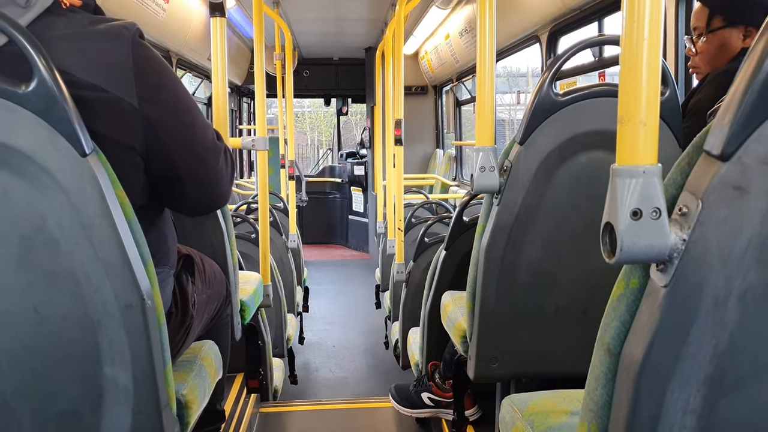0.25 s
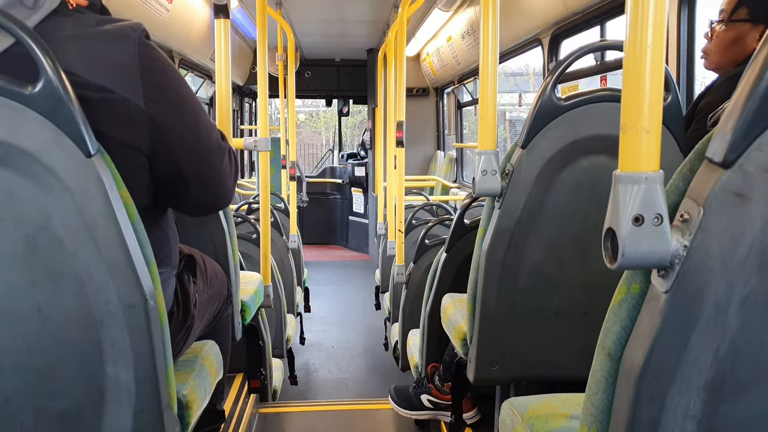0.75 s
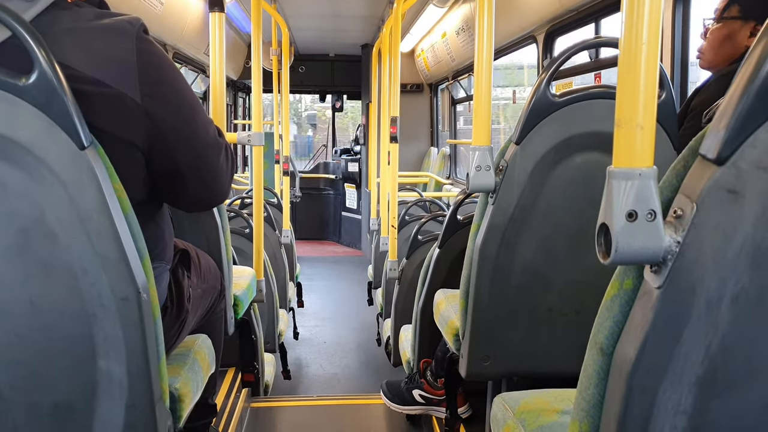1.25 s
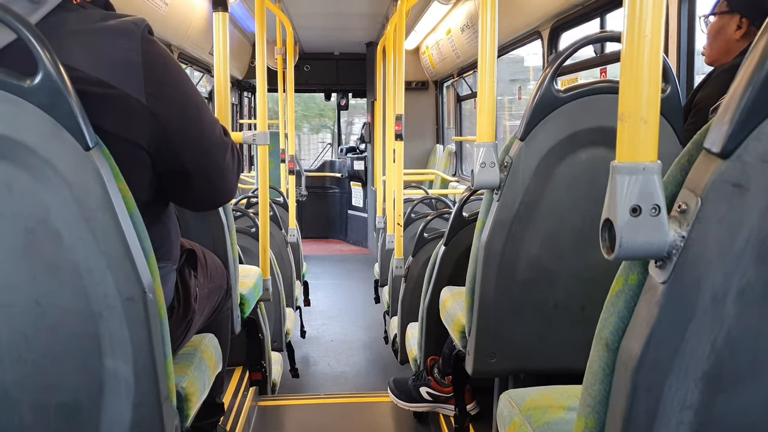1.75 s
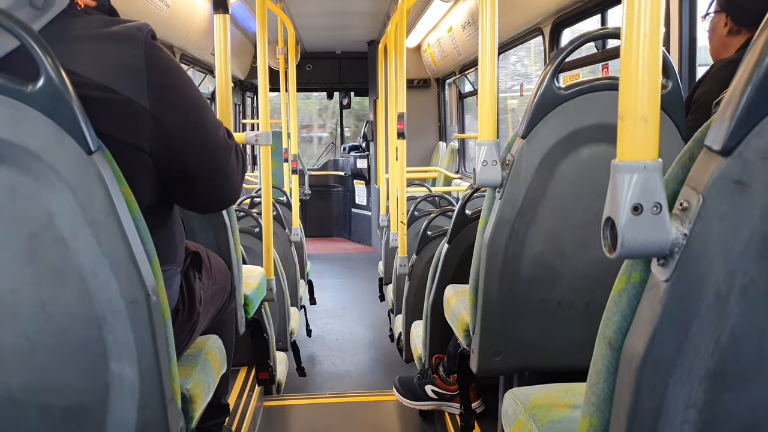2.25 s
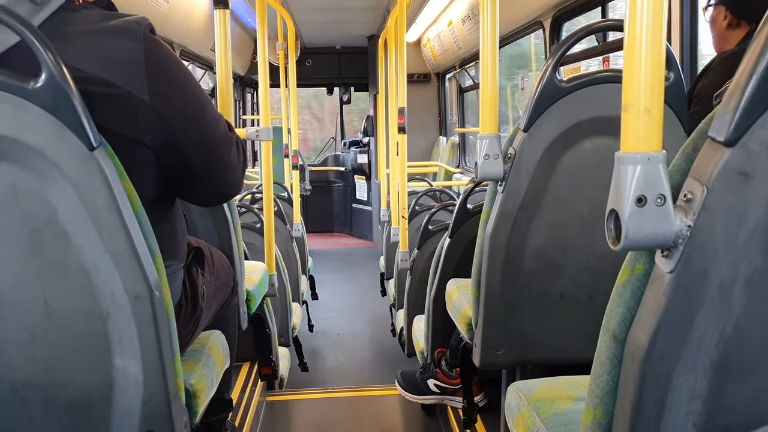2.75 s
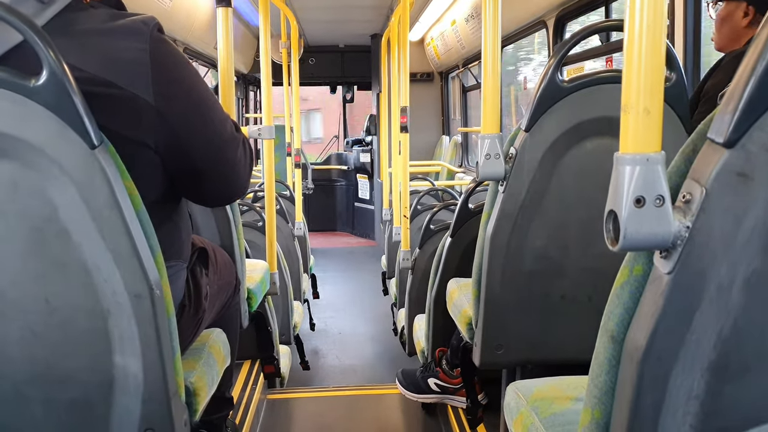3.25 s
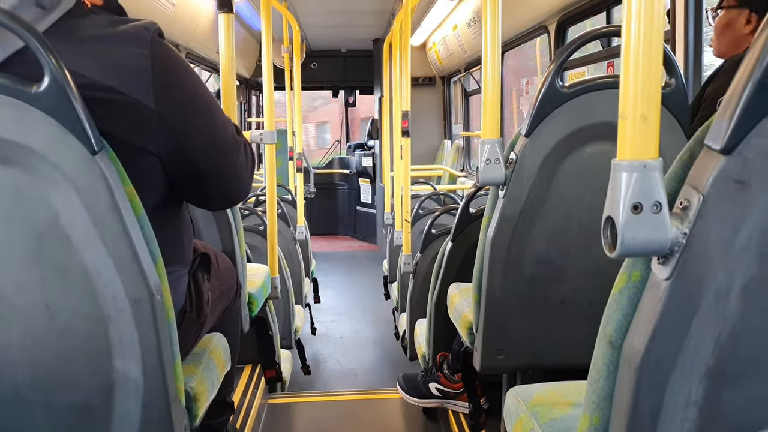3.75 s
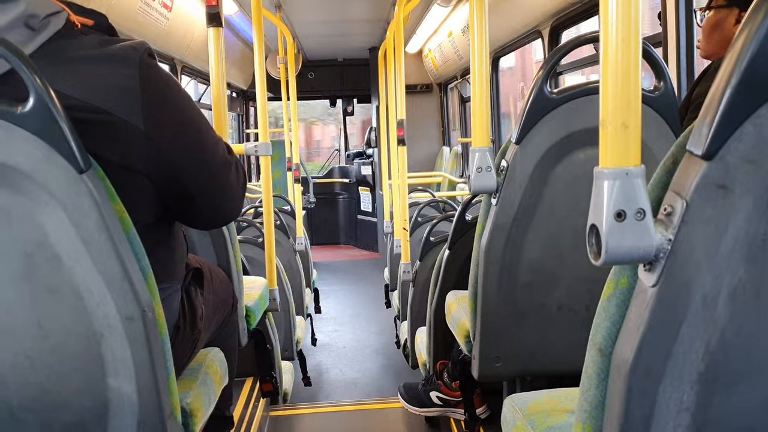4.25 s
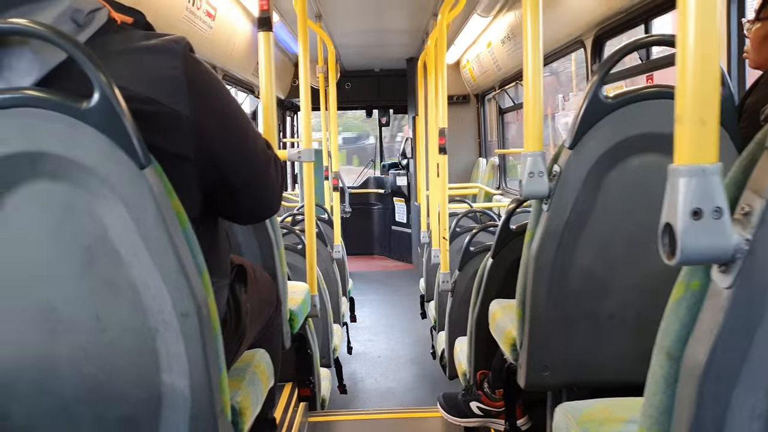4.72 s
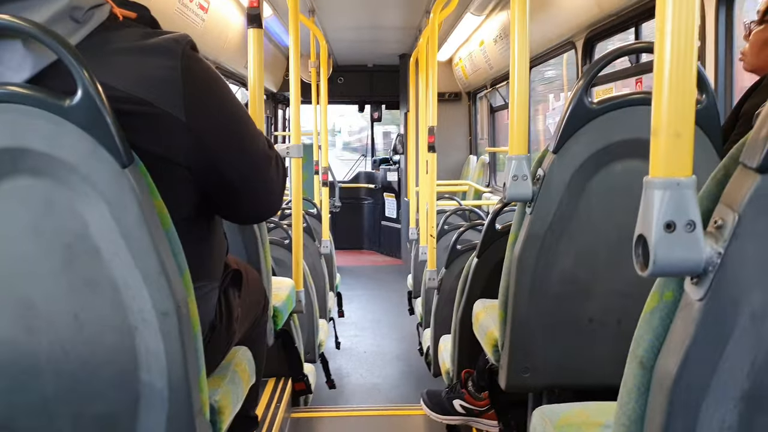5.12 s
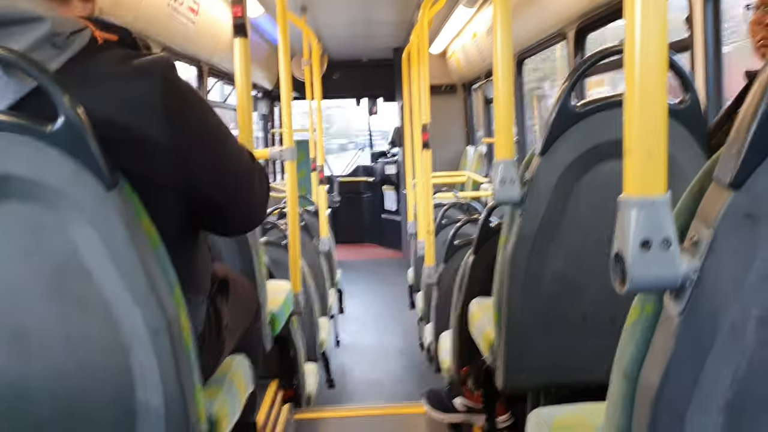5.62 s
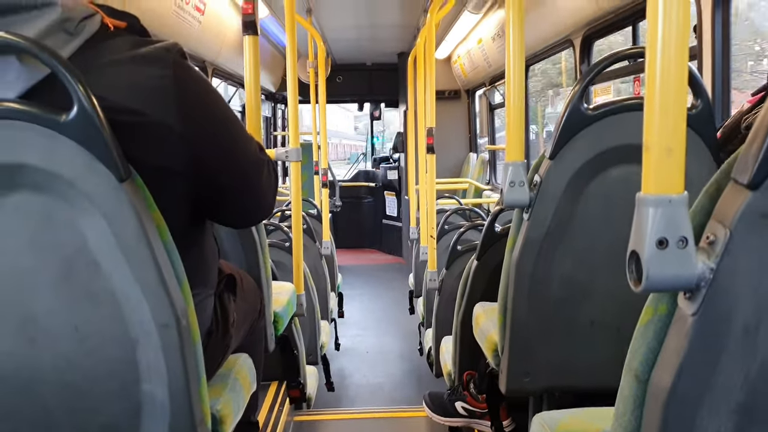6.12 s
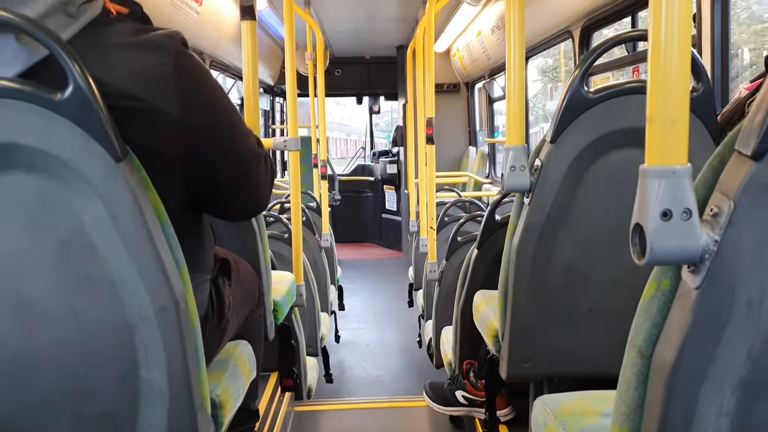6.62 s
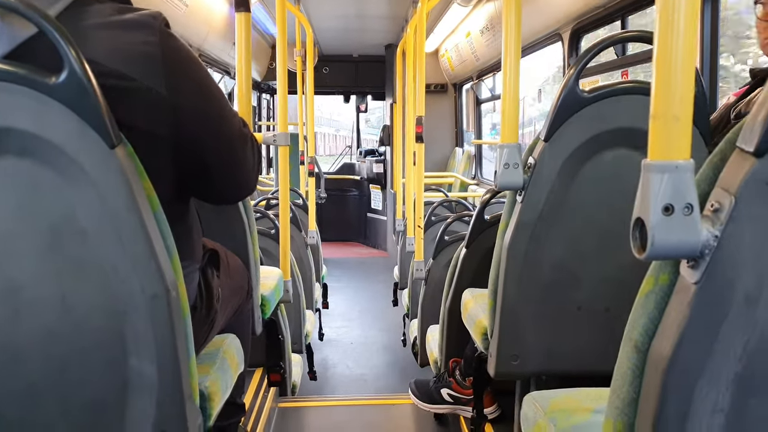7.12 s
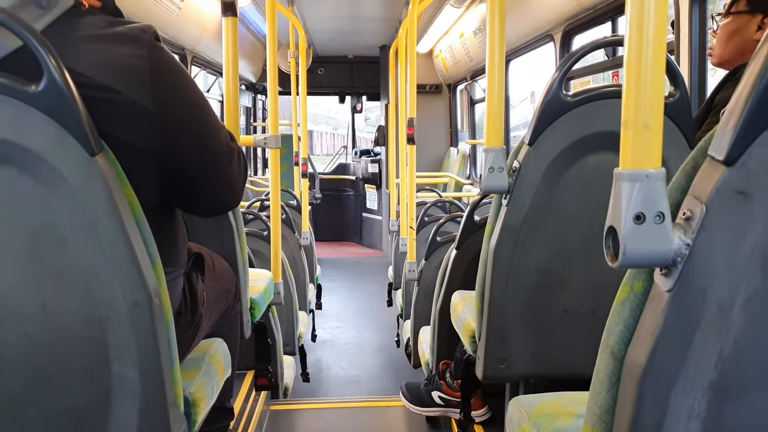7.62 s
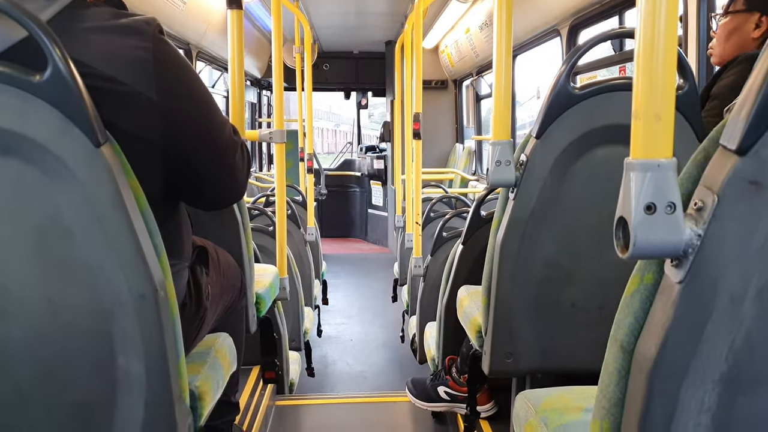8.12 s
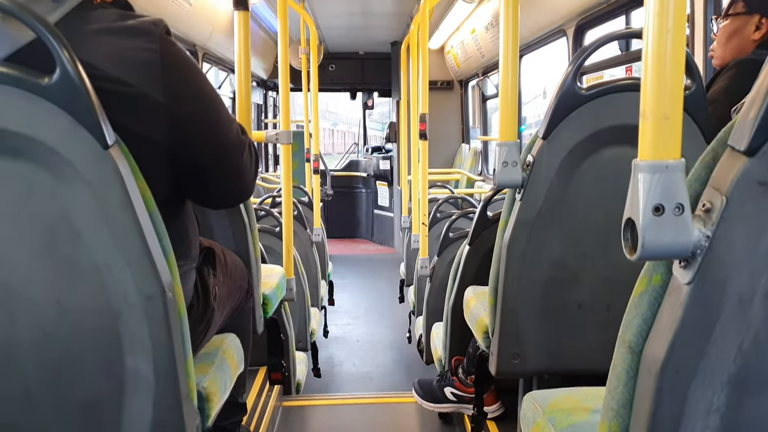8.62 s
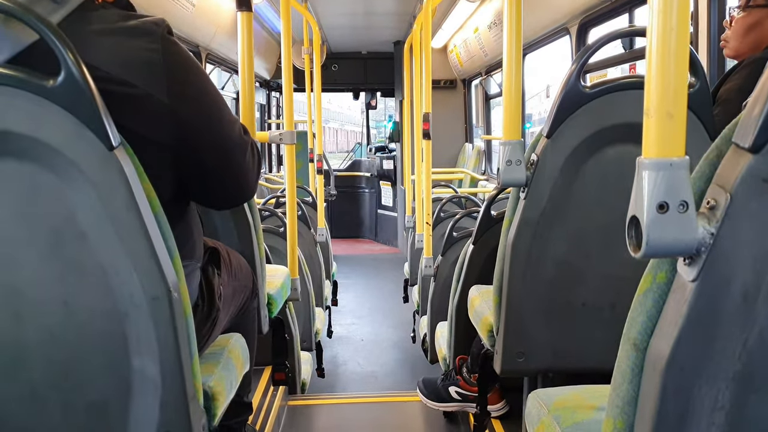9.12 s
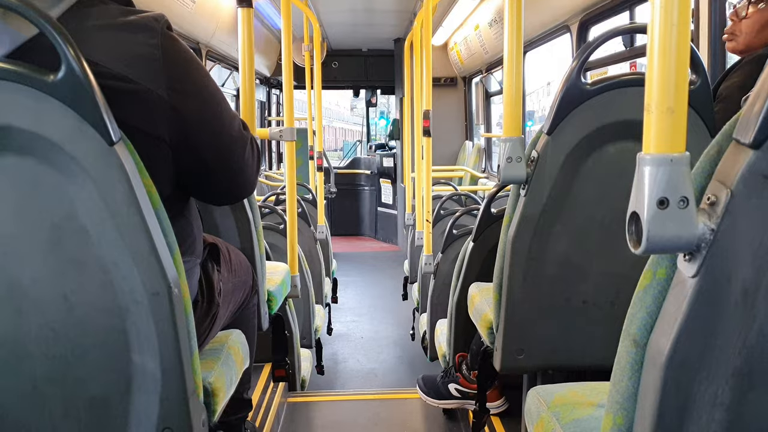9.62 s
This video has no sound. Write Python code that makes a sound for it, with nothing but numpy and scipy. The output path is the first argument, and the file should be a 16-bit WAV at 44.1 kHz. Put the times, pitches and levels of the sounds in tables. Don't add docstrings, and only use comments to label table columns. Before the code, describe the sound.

Heard from a seat inside a city bus, a six-cylinder diesel under the rear floor dominates. In the first 0.6 seconds its deep firing drone sweeps up nearly an octave, with a low floor thump and singing whines. It creeps up until 2 seconds, levels, then climbs steadily from 2.8 to 4.4, gear whine strongest around 3.5. It eases slightly and holds from 5 to 7.8, a little softer, inching higher. At about 8 the pull drops away and pitch sags until 8.4, then flares to a peak at 9 and settles lower, pulling again to the end. Boomy tire and engine roar runs throughout, with rough valve knocking clearest early. A very faint, high turbo whistle wavers from 4.7. Jolts bring brief trim ticks and buzzes, notably at 0.3, 3.3, 5.3, a cluster near 5.8 to 6, 6.7 and 9. Close, enclosed phone stereo with dull treble.

```python
import sys
import numpy as np
from scipy import signal
from scipy.fft import rfft, irfft, next_fast_len
from scipy.io import wavfile
from scipy.ndimage import uniform_filter1d

SR = 44100
rng = np.random.default_rng(int(sys.argv[2]) if len(sys.argv) > 2 else 0)


def unload_wav(signal):
    wavfile.write(
        sys.argv[1],
        SR,
        np.round(np.clip(np.atleast_2d(signal).T, -1, 1) * 32767).astype(np.int16),
    )


def level_to_linear(level):
    exponent = np.asarray(level, float) / 20
    return 10 ** exponent


N = 434812
T = np.arange(N) / SR
COARSE = 4
ENGINE_T = np.arange(N // COARSE + 1) * COARSE / SR

# (time [s], firing rate [Hz], firing boom [dB], second order [dB], gear whine [dB])
ENGINE = [(0.0, 36.3, -31, -29, -63), (0.15, 43.0, -19, -22, -68), (0.3, 55.5, -21, -26, -67),
          (0.45, 64.6, -17, -22, -46), (0.6, 67.9, -16, -29, -44), (0.75, 69.6, -18, -23, -44),
          (0.9, 70.7, -18, -20, -49), (1.05, 72.2, -18, -20, -54), (1.2, 72.9, -17, -20, -51),
          (1.35, 73.7, -18, -21, -49), (1.5, 74.3, -18, -24, -47), (1.65, 75.0, -18, -27, -50),
          (1.8, 75.5, -20, -30, -50), (1.95, 75.5, -21, -31, -48), (2.1, 74.9, -20, -29, -52),
          (2.25, 74.5, -21, -27, -48), (2.4, 74.3, -20, -29, -47), (2.55, 74.1, -19, -28, -49),
          (2.7, 74.8, -19, -27, -49), (2.85, 76.8, -22, -38, -51), (3.0, 79.5, -20, -25, -51),
          (3.15, 82.1, -17, -23, -45), (3.3, 84.9, -18, -27, -43), (3.45, 87.2, -18, -24, -38),
          (3.6, 89.8, -16, -24, -42), (3.75, 91.8, -15, -28, -41), (3.9, 94.0, -17, -24, -46),
          (4.05, 96.2, -18, -22, -47), (4.2, 99.2, -16, -19, -45), (4.35, 102.3, -17, -20, -42),
          (4.5, 101.2, -15, -17, -45), (4.65, 99.3, -17, -17, -47), (4.8, 97.5, -18, -17, -52),
          (4.95, 96.7, -20, -18, -57), (5.1, 96.6, -18, -20, -59), (5.25, 96.8, -18, -20, -54),
          (5.4, 96.8, -19, -20, -48), (5.55, 96.8, -20, -19, -52), (5.7, 97.0, -19, -20, -55),
          (5.85, 96.9, -19, -20, -55), (6.0, 96.9, -22, -21, -53), (6.15, 97.2, -21, -21, -56),
          (6.3, 97.5, -21, -21, -52), (6.45, 97.7, -22, -22, -53), (6.6, 98.0, -22, -21, -50),
          (6.75, 98.4, -21, -21, -51), (6.9, 98.7, -22, -20, -49), (7.05, 99.1, -22, -20, -46),
          (7.2, 99.7, -19, -21, -47), (7.35, 100.4, -19, -20, -47), (7.5, 100.9, -19, -20, -44),
          (7.65, 101.5, -19, -20, -45), (7.8, 102.3, -18, -23, -47), (7.95, 99.2, -20, -24, -46),
          (8.1, 90.3, -30, -34, -53), (8.25, 82.0, -31, -36, -54), (8.4, 78.4, -35, -37, -64),
          (8.55, 80.8, -28, -37, -52), (8.7, 89.3, -27, -40, -44), (8.85, 95.7, -25, -30, -46),
          (9.0, 99.8, -23, -26, -45), (9.15, 96.3, -19, -28, -45), (9.3, 90.5, -18, -28, -43),
          (9.45, 87.2, -18, -25, -40), (9.6, 86.5, -18, -26, -42), (9.75, 86.8, -19, -26, -40),
          (9.86, 87.0, -19, -26, -37)]
# (time [s], floor rumble [dB], engine roar [dB], clatter hiss [dB], air hiss [dB])
ROAR = [(0.0, -29.5, -34, -57, -72), (0.16, -17, -32, -53, -69.5), (0.41, -26, -29, -49, -65),
        (0.52, -20, -29.5, -51.5, -64.5), (0.84, -30, -29, -51.5, -66.5), (1.15, -26.5, -27.5, -51.5, -65),
        (1.45, -34, -28, -52, -66.5), (2.35, -35, -28.5, -53.5, -68.5), (2.49, -27.5, -29.5, -54.5, -69),
        (2.71, -34, -27.5, -54, -66.5), (3.53, -30, -26, -48.5, -63.5), (3.61, -38.5, -26, -49.5, -64.5),
        (3.75, -33, -27, -48.5, -63.5), (5.09, -31, -30, -49, -64), (5.63, -34.5, -30, -49, -63),
        (5.72, -23, -30, -47.5, -63.5), (6.15, -34.5, -32, -51, -64.5), (6.7, -31.5, -31.5, -52.5, -67),
        (7.63, -31, -29, -50, -65), (8.01, -27.5, -31, -52.5, -66), (8.59, -29.5, -32.5, -56.5, -71),
        (8.7, -27, -31.5, -53.5, -70), (9.05, -34, -27, -51.5, -68), (9.13, -24.5, -28, -51, -66),
        (9.82, -35, -28.5, -50, -64.5)]
# (frequency [Hz], likeness [0-1], left lead [rad], left minus right [dB])
PORTS = [(30, 1, .08, -0.5), (55, 1, .09, 0.5), (68.6, .95, 0.75, -2.5), (93.5, 0.6, .55, 0.8),
         (150, 1, 0.16, 2), (287, 0.76, .1, 0.5), (450, 0.5, 0.93, 3), (610, 0.2, 0.81, 4.5),
         (930, 0, 1.25, 3), (1610, 0.3, 2.28, 3.5), (2170, 0.1, 3.1, 10.5), (4500, 0, 3.1, 7),
         (6350, 0.01, 3.1, 8), (9000, 0, 3.1, 0.5), (13000, .03, 3.1, 5)]


def evened(x):
    return x / np.sqrt(np.mean(x ** 2) + 1e-20)


def read(points, hz, axis=1):
    rows = np.transpose(points)
    return np.interp(np.log(hz + 1), np.log(rows[0] + 1), rows[axis])


def drift(rate_hz, t):
    b, a = signal.butter(1, rate_hz * 512 / SR)
    slow = signal.lfilter(b, a, rng.standard_normal(N // 256 + 202))[200:]
    return np.interp(t * SR / 256, np.arange(len(slow)), evened(slow))


def treble_of(x, order, cutoff_hz):
    return signal.sosfilt(signal.butter(order, cutoff_hz, "high", fs=SR, output="sos"), x)


def cabin_db(hz):
    # (frequency [Hz], width [Hz], lift [dB])
    resonances = [(70.5, 20, 6.5), (162.2, 21.8, 8.5), (192.4, 27.7, 15.5), (266.2, 15.6, 10.5),
                  (298.1, 18.5, 9), (362.5, 42.4, 6.5), (421.8, 23.6, 7), (552, 46, 9), (792.3, 13.3, 12.5),
                  (881, 27, 4), (1036, 25, -0.5), (1542, 95, 12), (2270, 40, 7), (3380, 1500, 5.5),
                  (4560, 180, 5)]
    return sum(db / (1 + (2 * (hz - f) / width) ** 2) for f, width, db in resonances)


def ports(hz):
    level = level_to_linear(read(PORTS, hz, axis=3) / 2)
    half = level * np.exp(.5j * read(PORTS, hz, axis=2))
    return np.array([half, 1 / half])


def heard(x):
    size = next_fast_len(x.shape[-1])
    spectrum = rfft(x, size) * ports(np.fft.rfftfreq(size, COARSE / SR))
    return COARSE * irfft(spectrum, COARSE * size)[:, :N]


def order_tone(turn, k, db, waver_db, wander_rad):
    level = level_to_linear(db + waver_db * drift(3.4, ENGINE_T))
    phase = k * turn + 2 * np.pi * rng.random() + wander_rad * drift(3.7, ENGINE_T)
    return level * np.sqrt(2) * np.cos(phase)


def firing_boom(turn):
    s, _, boom_db, second_db, _ = np.transpose(ENGINE)
    boom = level_to_linear(np.interp(ENGINE_T, s, boom_db)) * np.cos(turn)
    octave = level_to_linear(np.interp(ENGINE_T, s, second_db) + 0.1) * np.cos(2 * turn + 1.72)
    return np.sqrt(2) * (boom + octave)


def strong_tones(turn):
    strong_orders = [.686, 2.745, 4.118, 2.205, 3, 4, 5, 8, 12, 36]
    # (time [s], then level of each tone [dB])
    strong_levels = [(0.0, -42.5, -35, -46.5, -39.5, -51.5, -52.5, -45, -84.5, -60, -52),
                     (0.35, -28.5, -49.5, -36, -43.5, -27.5, -65, -42, -73, -54, -46.5),
                     (0.6, -24.5, -54, -35, -35.5, -19.5, -40, -42, -46, -41, -50.5),
                     (0.9, -29.5, -66, -35.5, -27.5, -26, -39.5, -34, -50.5, -45, -61),
                     (1.25, -30.5, -46.5, -31, -26, -32, -35.5, -31, -51, -51, -56),
                     (1.7, -40.5, -41.5, -35, -29, -30.5, -26.5, -48, -69.5, -44, -62),
                     (2.5, -30.5, -38, -29.5, -24, -40.5, -31, -52.5, -50.5, -48.5, -60),
                     (3.0, -36, -61, -45, -28, -32, -29.5, -53.5, -67, -47, -64),
                     (3.35, -39, -51, -34, -29.5, -43, -44.5, -51.5, -51, -51, -63),
                     (3.7, -37.5, -58, -47, -33.5, -33.5, -34, -55, -60, -55, -64),
                     (4.05, -30, -26.5, -41.5, -35.5, -43.5, -36, -60, -52, -61, -70),
                     (4.4, -22, -30.5, -49.5, -25.5, -52, -46, -43, -49.5, -59, -57.5),
                     (4.8, -29.5, -37.5, -51, -33, -43.5, -35.5, -46.5, -59.5, -64.5, -69.5),
                     (5.5, -27.5, -34, -58, -36, -44.5, -42.5, -47.5, -57.5, -56, -68),
                     (6.3, -31, -40.5, -56, -36.5, -53, -43, -48, -47.5, -61, -71),
                     (7.102, -30, -33, -50, -38, -51.5, -42, -44.5, -54, -65.5, -62.5),
                     (7.75, -26.5, -33.5, -46, -28.5, -44.5, -52, -49, -59, -50, -68),
                     (8.1, -38, -31.5, -41.5, -37, -43, -58, -63, -68, -64, -67),
                     (8.45, -51.5, -52, -38, -27.5, -34, -70, -56, -74, -62, -79),
                     (8.8, -27.5, -43, -39, -36, -32, -44.5, -72, -65, -53, -73),
                     (9.1, -23.5, -24.5, -54, -27.5, -55, -50, -78, -58, -70, -76),
                     (9.4, -44.5, -33, -44, -39.5, -60, -32.5, -44, -55, -59, -67),
                     (9.8, -42.5, -32.5, -33, -28, -45, -36, -68, -58, -55, -71)]
    when, *levels = np.transpose(strong_levels)
    out = np.zeros(len(ENGINE_T))
    for k, db in zip(strong_orders, levels):
        size = min(k, 14)
        out += order_tone(turn, k, np.interp(ENGINE_T, when, db), 0.46 + 0.2 * size, 0.049 + 0.044 * size)
    return out


def lesser_tones(turn):
    firing_orders, belt_orders, gear_orders = [6, 7, 9, 10, 11, 16], [1.372, 3.43, 4.803, 4.41, 6.615], [18, 30]
    firing_levels, belt_levels, gear_levels = [-58.5, -56.5, -65, -58.5, -65, -65], [-38, -45.5, -49.5, -44.5, -49.5], [-63, -66]
    pairs = zip(firing_orders + belt_orders, firing_levels + belt_levels)
    lesser = sum(order_tone(turn, k, db, 2.35, 0.24) for k, db in pairs)
    gears = []
    for port in range(2):
        gears.append(sum(order_tone(turn, k, db, 3, .8) for k, db in zip(gear_orders, gear_levels)))
    return lesser + np.array(gears)


def gear_whine(turn):
    s, whine_db = np.transpose(ENGINE)[[0, 4]]
    throb = 1 + 0.23 * np.cos(turn / 3) + 0.16 * np.cos(turn / 6)
    level_db = np.interp(ENGINE_T, s, whine_db) - 1.2 + 2.2 * drift(16., ENGINE_T)
    mesh = order_tone(turn, 24, level_db, .6, .9) * throb
    left = level_to_linear(-3.5 + 1.6 * drift(20., ENGINE_T)) * mesh
    right = level_to_linear(1.5 + 1.6 * drift(20., ENGINE_T)) * np.roll(mesh, shift=2)
    return np.array([left, right])


def uneven_cylinders(turn):
    step = np.exp(1j * turn / 3)
    comb, now = np.zeros(len(turn)), np.ones(len(turn))
    for height, angle in rng.random((75, 2)):
        now = now * step
        comb += (level_to_linear(-9 * height + 7.5) * np.exp(2j * np.pi * angle) * now).real
    return comb


def engine():
    # (frequency [Hz], level [dB])
    crank_colour = [(30, -32.5), (200, -45.5), (400, -48), (600, -52.5), (900, -58.5), (1600, -62.5),
                    (2600, -77.5)]
    s, rate_hz = np.transpose(ENGINE)[:2]
    rate_hz = uniform_filter1d(np.interp(ENGINE_T, s, rate_hz), size=600)
    turn = 2 * np.pi * np.cumsum(rate_hz) * COARSE / SR

    size = next_fast_len(len(turn))
    f = np.fft.rfftfreq(size, COARSE / SR)
    comb = rfft(uneven_cylinders(turn), size) * level_to_linear(read(crank_colour, f))
    spectrum = (rfft(lesser_tones(turn), size) + comb) * level_to_linear(cabin_db(f) - 6)
    load_db = np.interp(ENGINE_T, *np.transpose(ROAR)[[0, 2]])
    load = level_to_linear(1.16 * (load_db - load_db.mean()))
    coloured = load * irfft(spectrum, size)[:, :len(turn)]

    tones = firing_boom(turn) + strong_tones(turn) + gear_whine(turn) + coloured
    return heard(tones), np.interp(T, ENGINE_T, turn)


def knock(turn):
    # (place [firings], level [dB])
    knock_places = [
        (.55, -4.5),
        (4, 3),
        (4.8, -18.5),
    ]
    # (time [s], level [dB])
    knock_levels = [(0, -41), (.5, -46), (3.5, -48), (5.2, -54.5), (5.6, -57.5), (8, -54), (8.3, -70),
                    (8.7, -65), (9.8, -55)]
    # (frequency [Hz], time to fade by 60 dB [s], level [dB])
    cover_rings = [(1480, 0.055, -5), (1560, .045, 5.5), (831, 0.069, -4), (568, 0.024, 0)]
    blows = np.zeros(N)
    for place, db in knock_places:
        cycle = np.floor((turn / (2 * np.pi) - place) / 6)
        at = np.flatnonzero(np.diff(cycle))
        blows[at] = level_to_linear(db + 3.9 * rng.uniform(-1, 1, len(at)))
    t = np.arange(2500) / SR
    ring = sum(level_to_linear(db - 60 * t / t60) * np.sin(2 * np.pi * hz * t) for hz, t60, db in cover_rings)
    ring = ring * np.minimum(t / 0.0036, 1)
    level = level_to_linear(np.interp(T, *np.transpose(knock_levels)))
    x = level * evened(signal.oaconvolve(blows, ring)[:N])
    return np.array([level_to_linear(5.5) * x, level_to_linear(1.0) * np.roll(x, shift=14)])


def turbo():
    # (time [s], frequency [Hz], level [dB])
    whistles = [
        [(4.7, 10000, -82), (5.3, 10900, -74.5), (5.7, 11280, -72.5), (6.6, 11180, -77), (7.4, 11000, -75),
         (7.8, 11000, -79), (8.0, 10400, -80), (8.3, 8500, -71)],
        [(8.2, 15300, -80), (8.4, 13500, -79), (8.58, 12300, -73), (8.8, 11850, -83), (9.1, 12300, -80),
         (9.5, 13000, -82)],
    ]
    out = np.zeros(N)
    for rows in whistles:
        s, hz, db = np.transpose(rows)
        on = (T > s[0]) & (T < s[-1])
        t = T[on]
        pitch = np.interp(t, s, hz) + 30 * drift(25., t)
        level = level_to_linear(np.interp(t, s, db) + 4 * drift(10., t))
        out[on] += level * np.sin(2 * np.pi * np.cumsum(pitch) / SR)
    return out * level_to_linear([[2.5], [-1.5]])


def rattles():
    # (time [s], thin tick [dB], buzz relative to tick [dB], length [s])
    jolts = [(0.163, -58, -6, 0.025), (0.314, -45, -8, 0.04), (0.343, -54, -2.5, 0.03),
             (0.598, -51, 3.5, 0.03), (0.937, -50, -1, 0.03), (1.246, -52, -1.5, 0.03),
             (2.738, -47.5, -5.5, 0.03), (3.016, -51, -1, 0.03), (3.325, -47, -1, 0.027),
             (3.788, -50, 5, 0.03), (5.295, -45.5, -3.5, 0.036), (5.34, -51.5, -1.5, 0.025),
             (5.7764, -45.5, 10, 0.038), (5.835, -51.5, 10.5, 0.055), (5.908, -53.5, 8.5, 0.033),
             (5.9773, -46.5, 12, 0.03), (6.658, -45, -3.5, 0.042), (7.658, -57, 7, 0.023),
             (8.5699, -53.5, 1.5, 0.044), (9.0034, -47.5, -2, 0.026), (9.291, -52, 9.5, 0.013)]
    # (frequency [Hz], width [Hz], level [dB])
    panel_modes = [(3780, 310, -7.5), (4230, 410, -2.5), (4660, 300, 2.5), (6000, 390, -12.5)]
    tick, buzz = np.zeros((2, 2, N + SR))
    t = np.arange(4000) / SR
    for s, db, buzz_db, length in jolts:
        clumping = evened(uniform_filter1d(rng.standard_normal(4000), size=90))
        contacts = evened(rng.standard_normal((2, 4000)) * level_to_linear(1.7 * clumping))
        fade = np.exp(-(t / np.clip(length, .005, .06)) ** 2)
        clump = contacts * np.minimum(t / .002, 1) * fade
        at = round(s * SR)
        tick[:, at:at + 4000] += level_to_linear(db - 1.5) * clump
        buzz[:, at:at + 4000] += level_to_linear(db + 1.84 * buzz_db - 4.5) * clump
    size = next_fast_len(N + SR)
    f = np.fft.rfftfreq(size, 1 / SR)
    thin = 1 / (1 + (8500 / (f + 1)) ** 8) / (1 + (f / 14000) ** 4)
    panel = sum(level_to_linear(db) / (1 + 2j * (f - hz) / width) for hz, width, db in panel_modes)
    panel = level_to_linear(3.5) * panel / (1 + (f / 6300) ** 6)
    spectrum = rfft(tick, size) * thin + rfft(buzz, size) * panel
    return irfft(spectrum * abs(ports(f)), size)[:, :N]


def roar(turn):
    band_centres = [40, 500, 4000, 11000]
    # (frequency [Hz], level [dB per Hz])
    noise_colour = [(22, -52.5), (36, -3), (65, -8.5), (130, -8.5), (250, -19.5), (540, -26), (700, -30),
                    (1050, -35.5), (2400, -41), (4500, -50.5), (6800, -56.5), (7800, -65), (11900, -59),
                    (15600, -67.5)]
    frames, hz = N // 512 + 5, np.fft.rfftfreq(2048, 1 / SR)
    s, *columns = np.transpose(ROAR)
    frame_s = np.arange(frames) * 512 / SR
    levels = [np.interp(frame_s, s, c - c.mean()) for c in columns]
    place = np.interp(np.log(hz + 1), np.log(band_centres), np.arange(4))
    level_db = sum(np.maximum(1 - abs(place - k), 0)[:, None] * levels[k] for k in range(4))

    a, b, c, d, patches = rng.standard_normal((frames, 1025, 5)).T
    same = np.clip(read(PORTS, hz), 0, 1)[:, None]
    left, other = a + 1j * b, c + 1j * d
    right = same * left + np.sqrt(1 - same ** 2) * other
    z = np.array([left, right]) * ports(hz)[:, :, None]

    patches = uniform_filter1d(patches, size=20, axis=0)
    patches = evened(uniform_filter1d(patches, size=8, axis=1))
    colour_db = read(noise_colour, hz) + 0.58 * cabin_db(hz)
    z *= level_to_linear(colour_db[:, None] + level_db + 0.89 * patches)

    ripple = evened(uniform_filter1d(rng.standard_normal((2, 1025)), size=3))
    depth_db = 2.43 * np.minimum(hz / 900, 1) / (1 + (hz / 6500) ** 4)
    z *= level_to_linear(ripple * depth_db)[:, :, None]
    x = level_to_linear(-23) * evened(signal.istft(z, nperseg=2048, noverlap=1536)[1][:, :N])

    chatter = 0.067 * np.cos(turn / 3) + 0.05 * np.cos(turn / 2 + 1) + 0.054 * np.cos(turn)
    chatter += 0.067 * drift(11.0, T)
    fizz = .14 * drift(9., T) * treble_of(x, 4, 7000)
    return x + chatter * treble_of(x, 2, 1100) + fizz


def scene():
    tones, turn = engine()
    return tones + knock(turn) + turbo() + rattles() + roar(turn)


def band_limit(x):
    return signal.sosfilt(signal.butter(12, 15720, fs=SR, output="sos"), x)


def record(dry):
    # (frequency [Hz], chance [0-1])
    dropouts = [(3000, .004), (5800, .03), (7600, .12), (9500, .015), (13000, .02), (15500, .12)]
    x = treble_of(dry, 3, 31)
    hz, t, z = signal.stft(x, SR, nperseg=1024)
    draw = rng.random((2, len(hz) // 4 + 1, len(t) // 4 + 1))
    draw = draw.repeat(4, axis=1).repeat(4, axis=2)[:, :len(hz), :len(t)]
    chance = (read(dropouts, hz) * (hz > 3000))[:, None]
    chance = chance * np.array([.5, 1.5])[:, None, None]
    mix = signal.istft(z * (draw > chance), SR, nperseg=1024)[1][:, :N]
    return band_limit(mix)


dry = scene()
out = record(dry)
unload_wav(out)
```